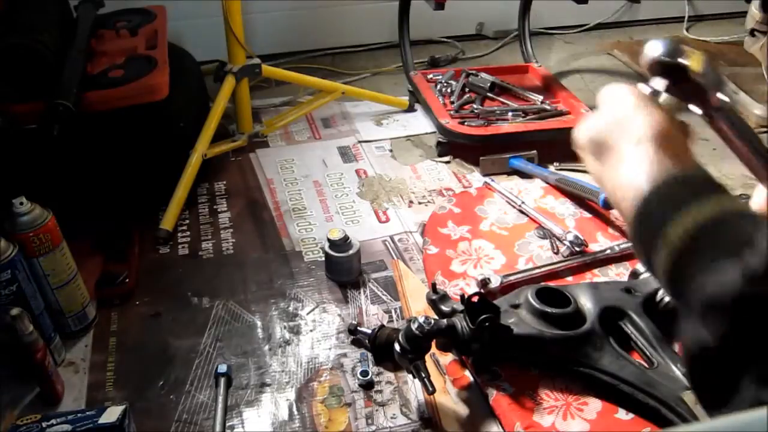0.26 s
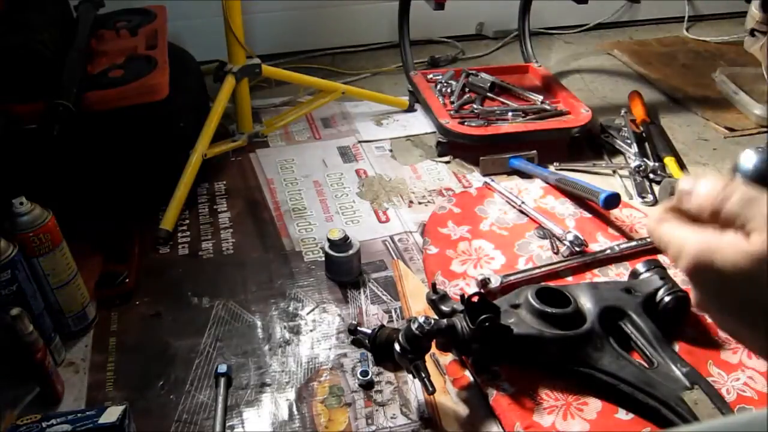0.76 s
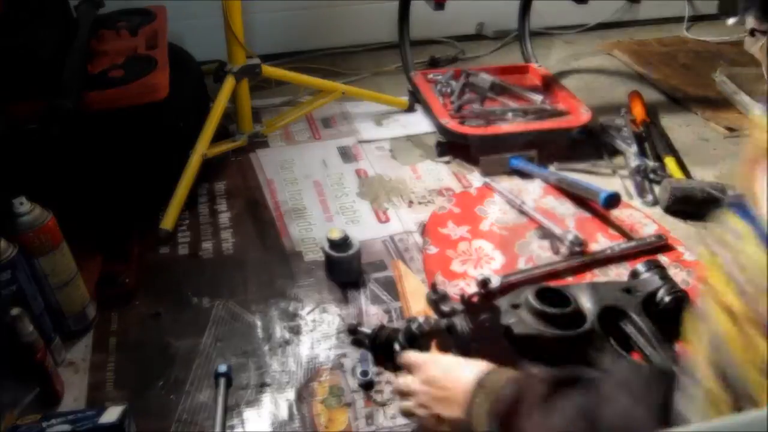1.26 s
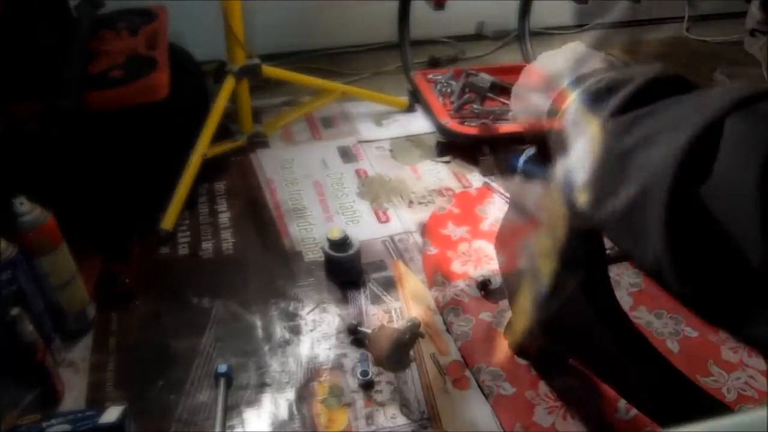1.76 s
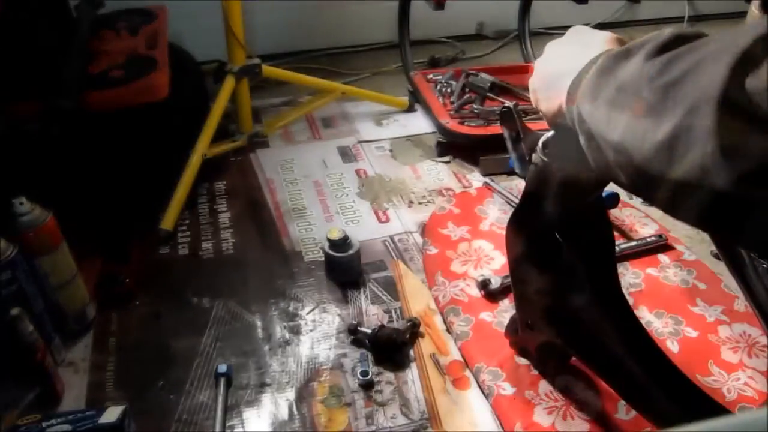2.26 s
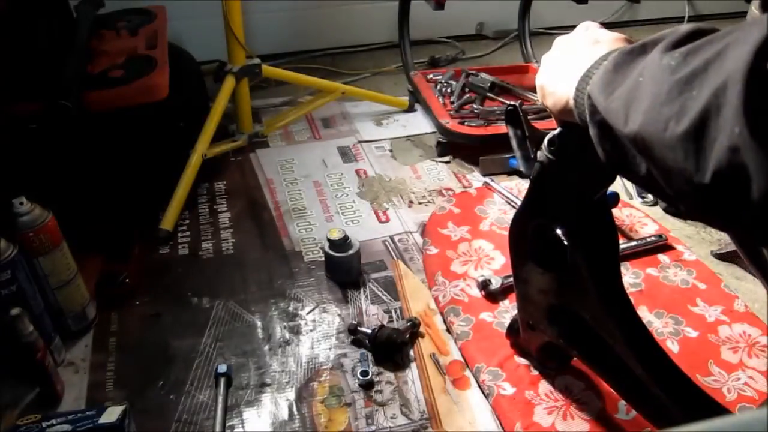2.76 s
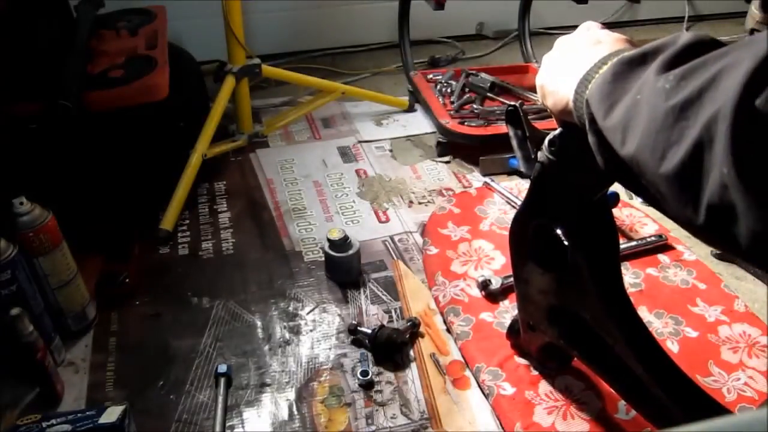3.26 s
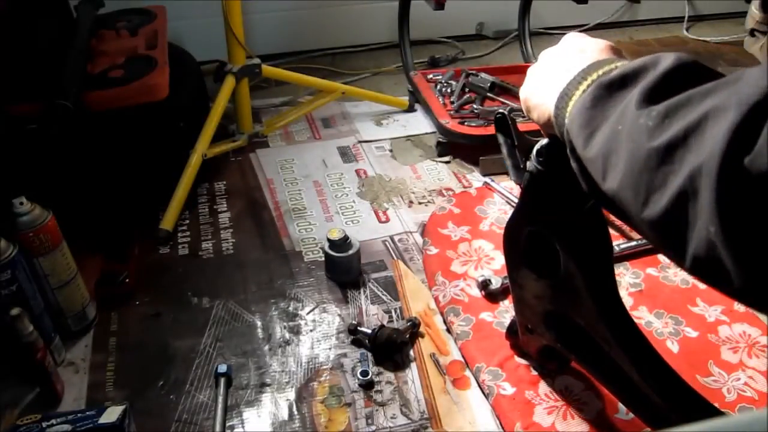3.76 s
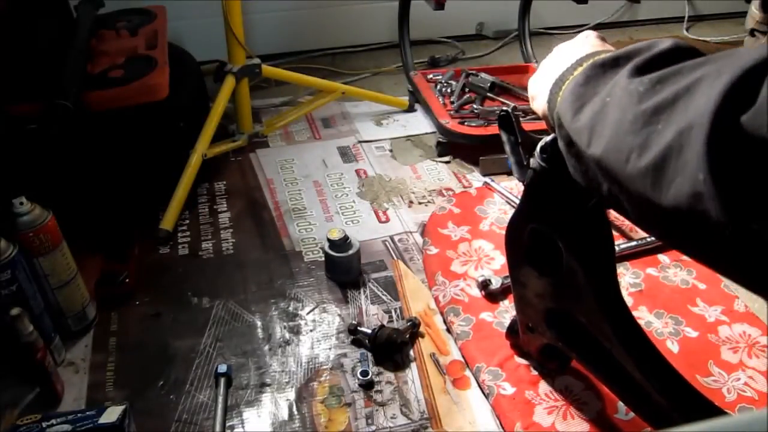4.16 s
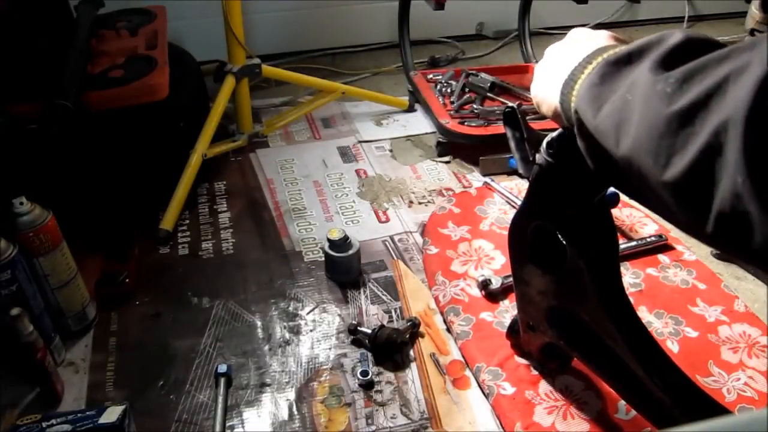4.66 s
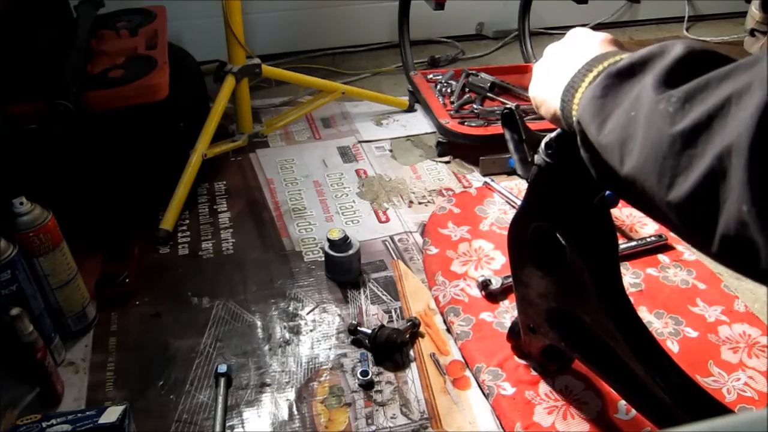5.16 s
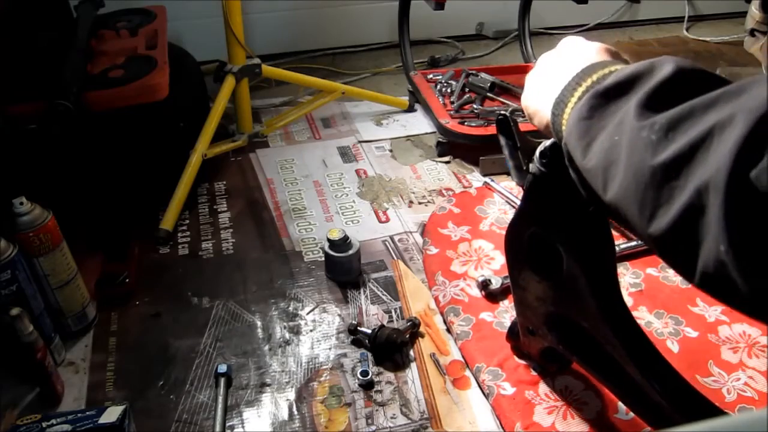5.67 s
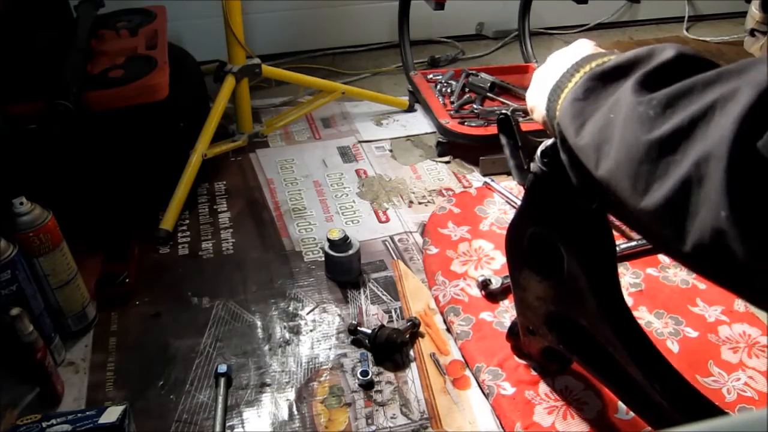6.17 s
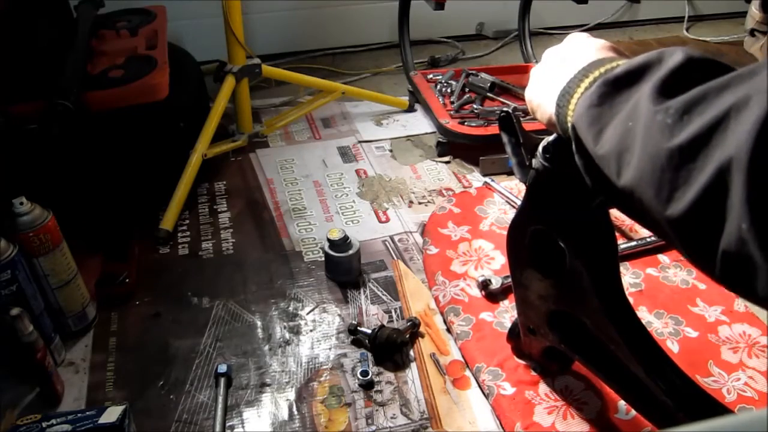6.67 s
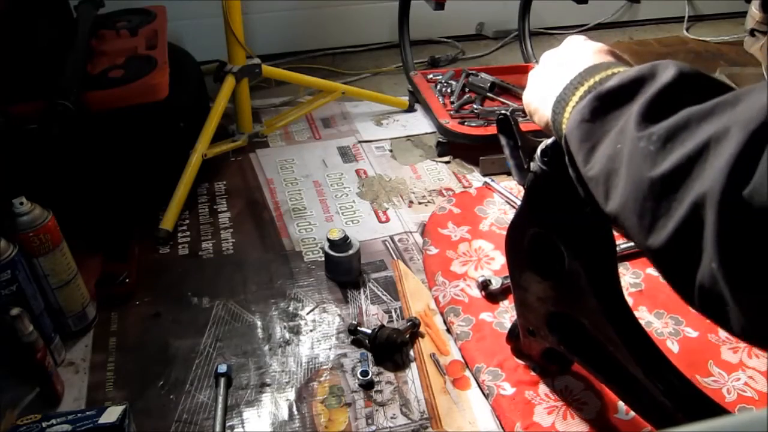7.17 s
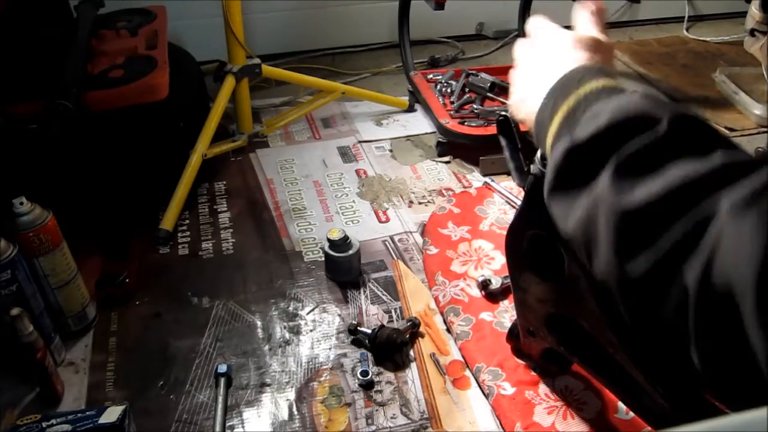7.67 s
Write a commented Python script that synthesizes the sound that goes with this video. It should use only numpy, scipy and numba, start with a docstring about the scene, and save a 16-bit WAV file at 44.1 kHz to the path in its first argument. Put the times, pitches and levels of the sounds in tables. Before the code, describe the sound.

Bright little metal clicks and soft bumps begin, followed by a rough half-second drag with a sliding hollow tone. Then a click-type torque wrench cracks loudly in three pairs, about two seconds apart, with short steel ring and brief garage echo. Ratchet play knocks dully between pairs, and a fuller knock with a high socket ring comes near the end. Sleeves rustle throughout; automatic gain on the nearby camera dips after each crack.

```python
"""Torque wrench in a small garage

A click-type torque wrench, a metre to the right of a camera's two microphones: three pulls, each a trip and a release.
Each click is a short burst of coloured noise plus decaying modes of the steel tube, with echoes of the garage.
Before the pulls a socket is fitted and the part is dragged over a mat: noise slips with a sliding resonance.
Thuds are decaying sines; sleeve rustle and room air are filtered noise, the mains hum a wavering sine.
The camera's gain control ducks under every loud click and creeps back."""
import sys
import numpy as np
from scipy import signal
from scipy.fft import rfft, irfft, next_fast_len
from scipy.io import wavfile
from scipy.ndimage import uniform_filter1d
from numba import njit

SR = 44100
rng = np.random.default_rng(int(sys.argv[2]) if len(sys.argv) > 2 else 0)


def waveform_to_disk(signal):
    """Save audio, clipped to [-1, 1], as 16-bit WAV at the path in sys.argv[1]."""
    frames = np.transpose(np.atleast_2d(signal))
    scaled = np.clip(frames, -1, 1) * 32767
    samples = np.round(scaled).astype(np.int16)
    wavfile.write(sys.argv[1], SR, samples)


N = 349757


def undb(db):
    """Turn dB into an amplitude gain."""
    return 10 ** (np.asarray(db) / 20)


def shelf(f, hz, db, order):
    """Gain of db well above hz, or well below it for a negative order."""
    return undb(db / (1 + (hz / f) ** order))


def noise_spectra(colour, size):
    """Spectra of two unrelated noises, rms 1, coloured by (Hz, dB) points; also the frequency axis."""
    hz, db = np.transpose(colour)
    f = np.arange(size // 2 + 1) * SR / size + 1  # 1 Hz up, so that the logarithm exists
    colour_gain = undb(np.interp(np.log(f), np.log(hz), db))
    spectra = rfft(rng.standard_normal((2, size))) * colour_gain
    rms = np.sqrt(np.mean(np.abs(spectra) ** 2) / size)
    return spectra / rms, f


def diffuse(colour, alike_hz=2500):
    """Sound from all around: alike at both microphones in the bass, unrelated in the treble."""
    size = next_fast_len(N)
    (mid, side), f = noise_spectra(colour, size)
    alike = 0.78 / (1 + (f / alike_hz) ** 2)
    mid = mid * np.sqrt((1 + alike) / 2)
    side = side * np.sqrt((1 - alike) / 2)
    return irfft(np.array([mid + side, mid - side]), size)[:, :N]


def walk(rate):
    """Random levels, rate of them a second, joined by straight slopes; spread a little under 1."""
    step = int(SR / rate)
    levels = np.repeat(rng.standard_normal(N // step + 1), step)
    return uniform_filter1d(levels, step)[:N]


def curves(table):
    """Columns of a (seconds, ..) table, interpolated at every sample."""
    s, *columns = np.transpose(table)
    return [np.interp(np.arange(N) / SR, s, column) for column in columns]


def add(track, s, sound):
    """Mix a sound into the track at s seconds."""
    i = int(s * SR)
    track[i:i + len(sound)] += sound[:N - i]


# Air of the room around the microphones. Each row: frequency in Hz, relative level in dB.
AIR_COLOUR = [(20, -13.5), (60, 10), (250, -8.5), (800, -11), (2500, -31.5), (7000, -27), (11000, -29.5),
              (15500, -34.5)]
AIR_DB = -49


def room_air():
    """Steady noise from all around, heaviest in the bass."""
    return diffuse(AIR_COLOUR) * undb(AIR_DB)


def mains_hum():
    """One low sine whose pitch and level waver, the same at both microphones."""
    hz = 57.6 + 1.5 * walk(6)
    db = -50 + 1.2 * walk(9)
    return np.sin(2 * np.pi * np.cumsum(hz) / SR) * undb(db)


# Sleeves and hands at work. Each row: time in seconds, rustle level in dB, low rubbing level in dB.
HANDS = [(0, -38.5, -61.5), (.2, -49.5, -56.5), (.5, -45, -43.5), (.8, -53, -53.5), (1.45, -41.5, -46.5),
         (2.1, -48, -45), (2.4, -48, -49.5), (2.68, -45, -47.5), (2.71, -50, -53.5), (3.1, -49, -53),
         (3.9, -45.5, -44.5), (4.1, -36.5, -40.5), (4.42, -39.5, -36), (4.5, -44.5, -41.5),
         (5.1, -43, -43.5), (5.74, -54, -68), (5.77, -33.5, -36.5), (6.0, -44.5, -41.5), (6.55, -41.5, -40),
         (7.7, -60.5, -46.5), (7.8, -39.5, -38.5)]
# Bright rustle of the cloth. Each row: frequency in Hz, relative level in dB.
RUSTLE_COLOUR = [(300, 1), (1000, 2.5), (3000, -0.5), (7000, -9), (11000, -9.5), (15500, -18)]
# Low rubbing of the hands. Each row: frequency in Hz, relative level in dB.
RUB_COLOUR = [(40, -7.5), (120, -2.5), (300, -0.5), (700, -5.5), (1500, -20.5), (3000, -47)]


def sleeves_and_hands():
    """Cloth rustle and low rubbing: two noises whose uneven levels follow the hands."""
    rustle_db, rub_db = curves(HANDS)
    rustle = diffuse(RUSTLE_COLOUR) * undb(rustle_db + 1.8 * walk(25))
    rub = diffuse(RUB_COLOUR) * undb(rub_db + 2.2 * walk(18))
    return rustle + rub


# The part and the knees bump the floor. Each row: start in seconds, pitch in Hz, level in dB.
BUMPS = [(0.149, 112, -32.5), (0.369, 246, -35), (0.47, 118.2, -42), (1.498, 315, -35), (2.549, 114, -37),
         (2.85, 110, -34.5), (3.992, 186, -18.5), (4.02, 376, -21.5), (4.29, 98.3, -23), (6.3, 119, -30.5)]
BUMP_T60_S = .17  # time to fall by 60 dB


def bumps():
    """Soft, dull thuds: decaying sines with a 15 ms onset."""
    out = np.zeros(N)
    t = np.arange(SR // 3) / SR
    onset = np.minimum(t / 0.015, 1)
    for s, hz, db in BUMPS:
        add(out, s, undb(db - 60 * t / BUMP_T60_S) * onset * np.sin(2 * np.pi * hz * t))
    return out


@njit
def sliding_bandpass(x, hz, share):
    """State-variable band-pass with a moving centre; width = share of the centre."""
    out, band, low = np.empty(len(x)), 0., 0.
    for i in range(len(x)):
        g = np.tan(np.pi * hz[i] / SR)
        v = (band + g * (x[i] - low)) / (1 + g * (g + share))
        band = 2 * v - band
        low = low + 2 * g * v
        out[i] = share * v
    return out


# Part dragged over the mat and tipped up. Each row: time in seconds, level in dB, hollow resonance in Hz.
DRAG = [(1.6, -73, 1282), (1.773, -33, 1340), (1.81, -36, 1320), (1.86, -29, 1302), (1.93, -27.5, 1017),
        (1.989, -23, 1675), (2.07, -32.5, 1700), (2.124, -21.5, 644), (2.174, -31.5, 520),
        (2.198, -24.5, 579), (2.309, -48, 596), (2.42, -87, 612)]
# Scrape of the slips. Each row: frequency in Hz, relative level in dB.
DRAG_COLOUR = [(200, -16.5), (600, -7.5), (1600, -3), (4300, 1), (7000, -8), (10500, -7), (13500, -11),
               (15500, -25.5)]
HOLLOW_DB, HOLLOW_FULL_DB = 10.5, -22.5  # extra gain of the hollow noise, and the drag level where it holds
HOLLOW_GROWTH = .6  # dB of that gain lost per dB of lighter drag


def drag():
    """Dense slips on the mat, uneven in size, with a hollow resonance that slides as the part tips."""
    before = (DRAG[0][0] - .05, -90, DRAG[0][2])
    after = (DRAG[-1][0] + .1, -90, DRAG[-1][2])
    db, hz = curves([before, *DRAG, after])
    slips = diffuse(DRAG_COLOUR) * undb(2.6 * walk(400) + 1.3 * walk(60))
    hollow_db = HOLLOW_DB + HOLLOW_GROWTH * (db - HOLLOW_FULL_DB)
    hollow = sliding_bandpass(rng.standard_normal(N), hz, 0.26) * undb(hollow_db)
    return undb(db) * (slips + hollow)


def ring(hz, t60, db):
    """Decaying modes, each struck a little differently and made to flutter by the loose parts inside."""
    t = np.arange(SR // 2)[:, None] / SR
    strike, rate, phase = rng.standard_normal((3, len(hz)))
    flutter = 1 + .35 * np.sin(2 * np.pi * (25 + 8 * rate) * t + 3 * phase)
    db = db + 2.5 * strike - 60 * t / t60
    return (undb(db) * flutter * np.sin(2 * np.pi * hz * t)).sum(axis=1)


TRIP, RELEASE, RATCHET, FITTING = range(4)  # kinds of blow
# Steel-on-steel crack. Each row: frequency in Hz, then relative level in dB for trip, release, ratchet, socket.
CRACK = [(147, -32, -27.5, -26, -23.5), (288, -9, -17, -26, -13.5), (510, -22, -17, -12.5, -30),
         (865, -4, -9, -18.5, -18.5), (1420, -20.5, -12, -7.5, -12.5), (1900, -5.5, -1.5, -4.5, -6.5),
         (3270, -2, 1.5, -1.5, 1), (3532, -6.5, -3.5, 1, -6), (4250, 3, 3.5, 0, 1.5),
         (5200, -11.5, -8.5, -6, -5.5), (6260, 2, -3.5, -8, -9.5), (9550, -11.5, -9.5, -17, -14.5),
         (10340, 3.5, -1, -6, -8), (12860, -15.5, -17.5, -16, -9), (16000, -7, -34, -20, -36)]
# Ringing modes of the wrench's steel tube. Each row: pitch in Hz, time to fall by 60 dB in seconds,
# then strength in dB for trip, release, ratchet, socket, before each strike's chance.
TUBE = [(780, .14, -54, -39, -50, -56), (1100, .045, -50, -50, -50, -28), (1690, .28, -52, -33, -35, -60),
        (2045, .2, -40, -38, -46, -60), (2480, .2, -38, -44, -46, -48), (2660, .25, -48, -37, -46, -46),
        (3072, .34, -38, -36, -35, -46), (3747, .75, -48, -60, -56, -60), (3811, .25, -52, -36, -42, -56),
        (4215, .25, -40, -40, -46, -48), (4465, .4, -44, -48, -50, -56), (4595, .22, -50, -36, -44, -56),
        (4900, .5, -49, -56, -56, -60), (5889, .12, -36, -36, -43, -40), (6072, .3, -46, -42, -50, -50),
        (6912, .18, -41, -46, -56, -56), (10590, .06, -34, -40, -60, -56)]
# One value for each kind of blow:
CRACK_STOP = (1.2, 3.1, 1.35, 1.53)  # exponent of the decay: a high one rattles on, then stops short
CRACK_RISE_S = (0.0009, 0.0022, 0.00063, 0.0014)
TICK_GAIN = (0.37, 0.15, .05, 0.18)


def blow(rattle_s, kind, body_db=0., treble_db=0.):
    """Steel on steel: a brief tick, a crack that rattles on for a few ms, and the tube it sets ringing."""
    crack, tube = np.array(CRACK), np.array(TUBE)
    spectra, f = noise_spectra(crack[:, [0, 1 + kind]], size=4096)
    t = np.arange(4096) / SR
    colour = shelf(f, 5400, treble_db, order=4) * shelf(f, 1400, body_db, order=-4)

    # the pawl chatters, then stops short; loose parts fade
    decay = np.exp(-(t / max(rattle_s, 1e-4)) ** CRACK_STOP[kind])
    burst = irfft(spectra[0] * colour) * decay * np.minimum(t / CRACK_RISE_S[kind], 1)

    # first contact: brief and bright
    tick = irfft(spectra[1] * colour * shelf(f, 5300, -16.0, order=-2)) * np.exp(-t / 0.00057)

    # a fuller knock stirs the low modes more
    hz, t60 = tube[:, 0], tube[:, 1]
    out = ring(hz, t60, tube[:, 2 + kind] + body_db / (1 + (hz / 1500) ** 4))
    out[:4096] += 0.49 * burst + TICK_GAIN[kind] * tick
    return out


# The socket is pushed onto the drive; the first row is a clack already dying away as the sound begins, later
# long rattles are scrapes. Each row: start in seconds, level in dB, rattle decay in seconds, treble shelf in
# dB.
SOCKET = [(0.001, -14.5, 0.022, -2), (.144, -22.5, 0.004, -20.5), (0.283, -26.5, 0.025, -44),
          (.301, -14.5, 0.0058, -42), (.321, -3, 0.0023, -5), (0.372, -10, 0.004, -15),
          (0.421, -12, 0.0021, -4.5), (.461, -11, 0.0036, 2.5), (0.469, -16, 0.0041, 7.5),
          (.474, -9, 0.0032, 12.5), (0.571, -14, 0.0095, -1.6), (.577, -7.5, .0024, 11.5),
          (0.582, 9.5, 0.0043, 15), (.592, -1, 0.0055, -6), (0.907, -16.5, .003, -7),
          (0.912, -15.5, .0043, 12), (.92, -14.5, 0.0089, -25)]
SOCKET_BODY_DB = 2.5


def socket_fitting():
    """Small clicks and scrapes of steel as the socket goes on."""
    out = np.zeros(N)
    for s, db, rattle_s, treble_db in SOCKET:
        add(out, s, undb(db) * blow(rattle_s, FITTING, SOCKET_BODY_DB, treble_db))
    return out


# The socket, loose in the hand, rings freely. Each row: start in seconds, level in dB before chance.
SOCKET_RINGS = [(.582, -54), (0.913, -44), (7.526, -17)]
SOCKET_HZ, SOCKET_T60_S = 12360, .36


def socket_rings():
    """One high, fluttering mode of the small steel socket."""
    out = np.zeros(N)
    for s, db in SOCKET_RINGS:
        add(out, s, ring(np.array([SOCKET_HZ]), SOCKET_T60_S, db))
    return out


# Play in the ratchet knocks. Each row: start in seconds, level in dB, body shelf in dB, treble shelf in dB.
KNOCKS = [(3.947, 4, -7, -23), (3.956, -8.5, 15, -21.5), (4.01, -19, -3, -19), (4.302, -21, 7, -22),
          (4.321, -1.5, 4.5, -31), (4.357, -12.5, 12, -26.5), (6.078, -10, -13, -28),
          (6.121, -13.5, 10, -9), (6.134, -15, 7, -10), (6.152, -19, 12, -11), (6.538, -21.5, 17, -31),
          (7.508, -9, 14, -15.5), (7.519, 7, 2, -11), (7.526, 14.5, -2.5, -9.5), (7.736, -27.5, 27, 6),
          (7.745, -25.5, 18, -11)]
KNOCK_RATTLE_S = 0.0059


def ratchet_knocks():
    """Knocks of the ratchet's play, from thin to full, most of them dull."""
    out = np.zeros(N)
    for s, db, body_db, treble_db in KNOCKS:
        add(out, s, undb(db) * blow(KNOCK_RATTLE_S, RATCHET, body_db, treble_db))
    return out


# The pawl slips off its seat at the set torque.
# Each row: start in seconds, level in dB, rattle decay in seconds.
TRIPS = [(3.1554, 22.5, 0.0069), (5.1662, 19, 0.013), (6.9684, 23.5, 0.0088)]
# It snaps back as the handle is let go. Each row: start in seconds, level in dB, rattle decay in seconds.
RELEASES = [(3.5332, 19.5, .013), (5.5228, 20, 0.012), (7.2999, 22.5, 0.011)]


def torque_clicks():
    """The loud clicks of the pawl: a trip and a release for each pull."""
    out = np.zeros(N)
    for kind, table in ((TRIP, TRIPS), (RELEASE, RELEASES)):
        for s, db, rattle_s in table:
            add(out, s, undb(db) * blow(rattle_s, kind))
    return out


def wrench():
    """All clicks, knocks and rings; so small a tool radiates no bass."""
    out = torque_clicks() + ratchet_knocks() + socket_fitting() + socket_rings()
    return signal.sosfilt(signal.butter(2, 170, "high", fs=SR, output="sos"), out)


# Echoes of the garage. Each row: band centre in Hz, time to fall by 60 dB in seconds, relative level in dB.
ROOM = [(205, 0.16, 2), (475, 0.36, 4.5), (1180, 0.34, 4), (2630, 0.38, 0.5), (4900, 0.38, -0.5),
        (9530, 0.25, -2.5)]
ROOM_DB = -7.5  # all echoes together, against the direct sound
LEFT_LAG_S, LEFT_SHADE_DB = 5.0e-5, -6


def garage(x):
    """Direct sound, a hair late at the left microphone, and bands of echoes that die at their own pace."""
    size = next_fast_len(N + SR)
    t = np.arange(N) / SR
    echoes = 0
    for hz, t60, db in ROOM:
        band = diffuse([(hz / 4, -40), (hz / 1.6, -.1), (hz * 1.4, -.1), (hz * 4, -40)])
        echoes = echoes + band * np.sqrt(hz) * undb(db - 60 * t / t60)
    # nearest surfaces answer first, 2 ms after the direct sound
    echoes = echoes[:, :SR] * np.clip((t[:SR] - .002) / 0.0013, 0, 1)
    echoes *= undb(ROOM_DB) / np.sqrt((echoes ** 2).sum() / 2)

    f = np.arange(size // 2 + 1) * SR / size + 1
    direct = np.exp(-2j * np.pi * f * np.array([[LEFT_LAG_S], [0]]))
    direct[0] *= shelf(f, 4900, LEFT_SHADE_DB, order=4)  # the camera body shades the far microphone
    return irfft(rfft(x, size) * (direct + rfft(echoes, size)), size)[:, :N]


def scene():
    """Room air, hum, sleeves, bumps and drag, with the wrench sounding in the garage."""
    background = room_air() + mains_hum() + sleeves_and_hands()
    return background + bumps() + drag() + garage(wrench())


@njit
def follow(peak, start, attack, hold, release):
    """Level follower: rises by a share of the gap, waits hold samples, then sinks at a steady dB rate."""
    out, level, wait = np.empty(len(peak)), start, 0.
    for i in range(len(peak)):
        if peak[i] > level:
            level, wait = level + (peak[i] - level) * attack, hold
        elif wait > 0:
            wait -= 1
        else:
            level *= release
        out[i] = level
    return out


TOP_HZ = 15600  # the camera keeps nothing above


def record(dry):
    """Camera: duller left microphone, a notch in the treble, two-speed gain control, overload, top cut."""
    size = next_fast_len(N)
    f = np.arange(size // 2 + 1) * SR / size + 1
    left = irfft(rfft(dry[0], size) * shelf(f, 7400, -5.0, order=6), size)[:N]
    x = np.array([left, dry[1]])
    x = signal.sosfilt(signal.butter(3, [7550, 8800], "bandstop", fs=SR, output="sos"), x)

    # one gain for both channels, already turned down at the start; sinking 32 and 7 dB a second
    peak = np.abs(x).max(axis=0)
    quick = follow(peak, undb(-3.5), 1 / (0.0023 * SR), .3 * SR, undb(-32. / SR))
    # repeated loud clicks keep the gain down for longer
    slow = follow(quick, undb(-25.0), 1 / (1.2 * SR), .1 * SR, undb(-7. / SR))
    gain = np.minimum(undb(-10.5) / np.maximum(quick, slow), 1)

    overloaded = np.clip(x * gain, -1, 1)
    return signal.sosfilt(signal.ellip(9, .2, 72, TOP_HZ, fs=SR, output="sos"), overloaded)


dry = scene()
out = record(dry)
waveform_to_disk(out)
```